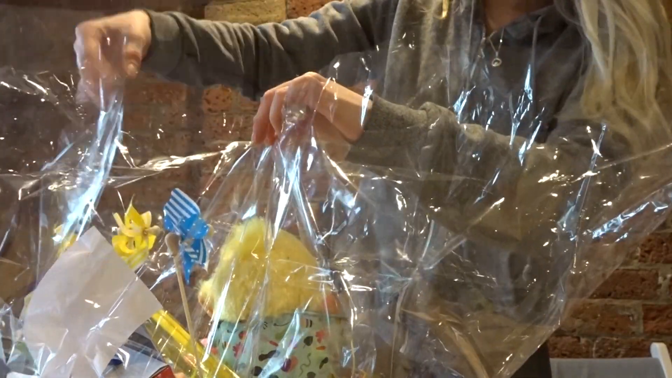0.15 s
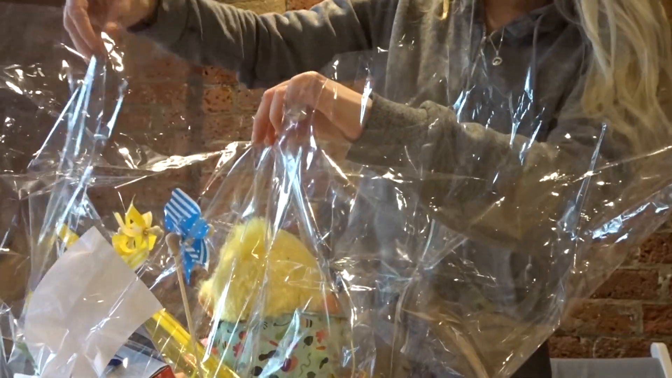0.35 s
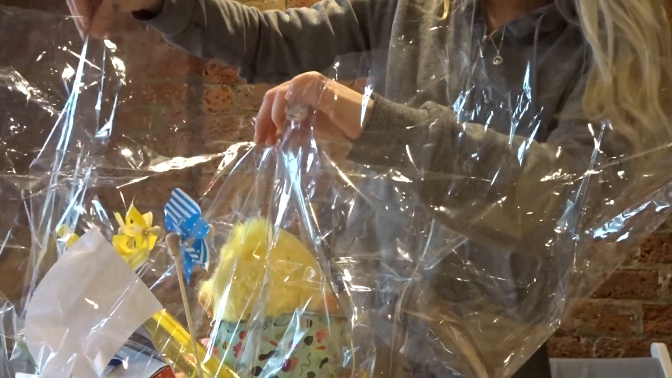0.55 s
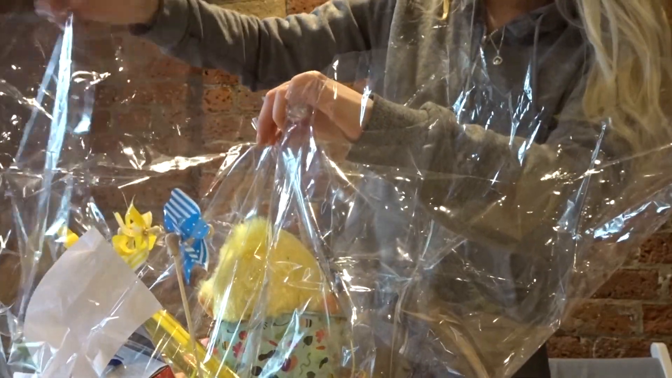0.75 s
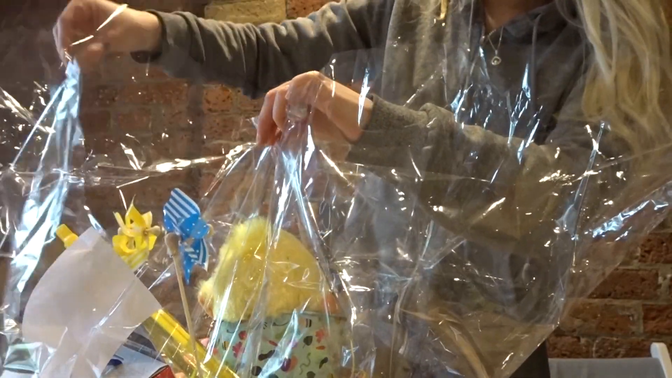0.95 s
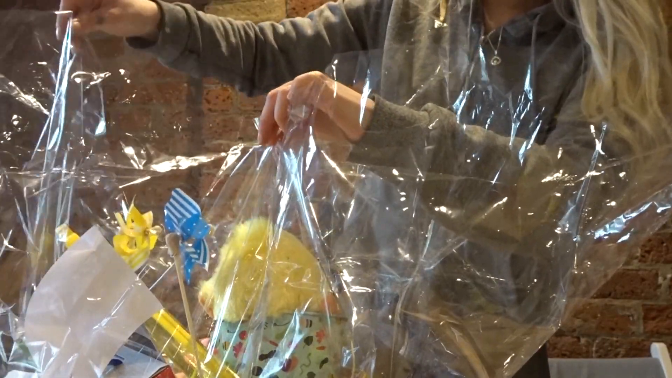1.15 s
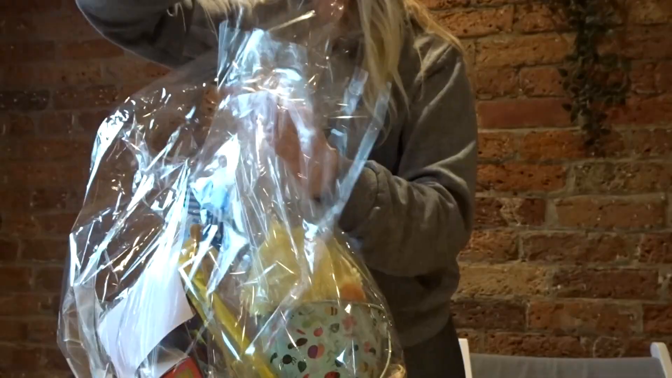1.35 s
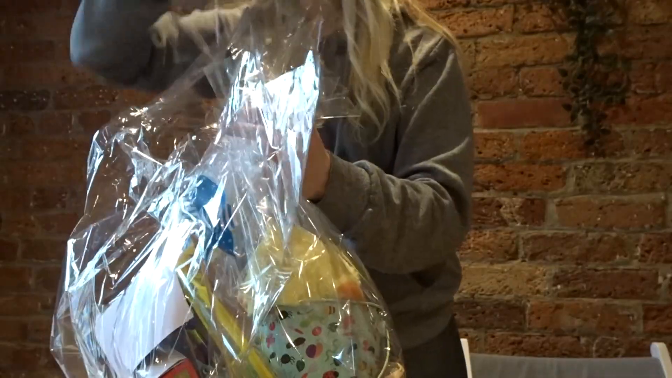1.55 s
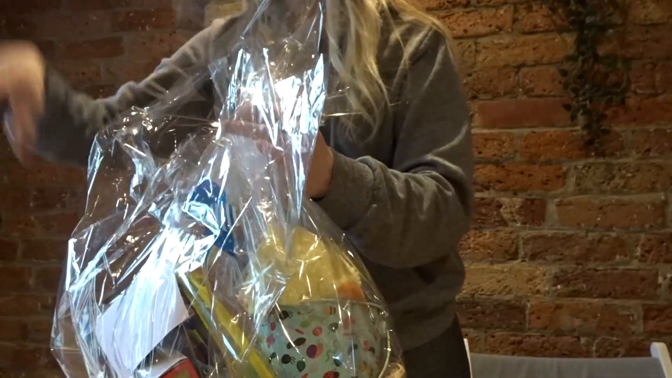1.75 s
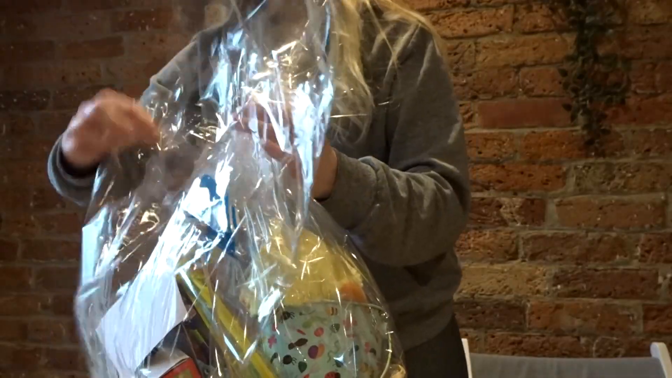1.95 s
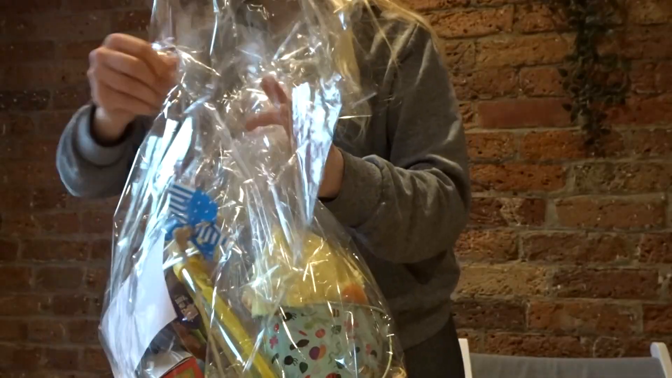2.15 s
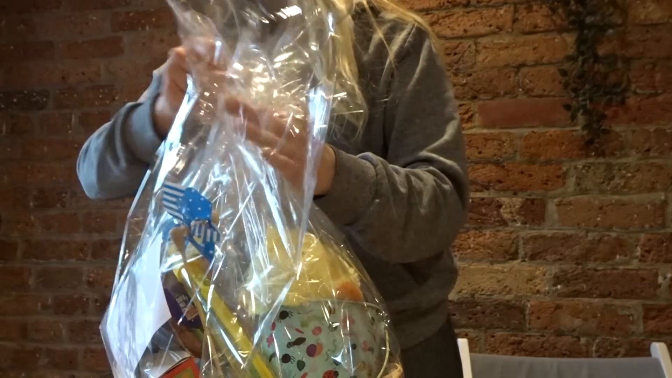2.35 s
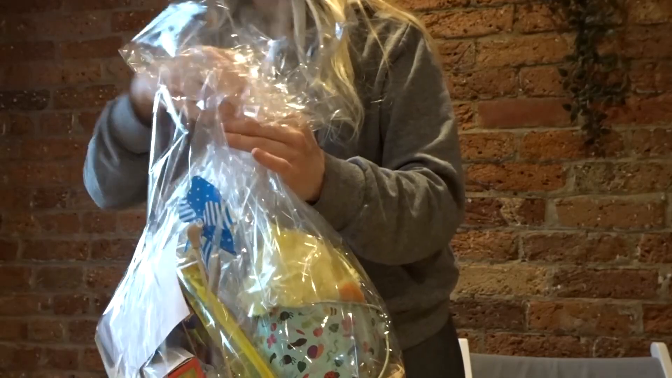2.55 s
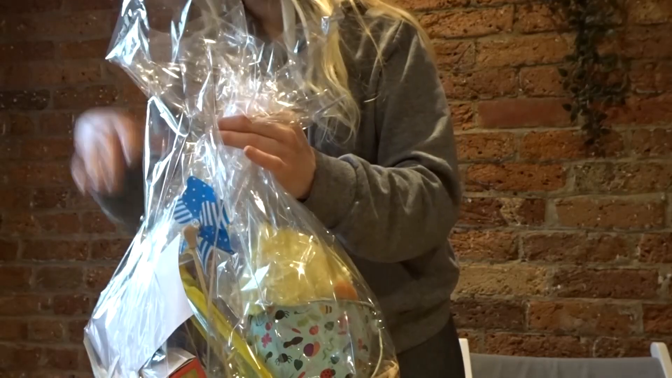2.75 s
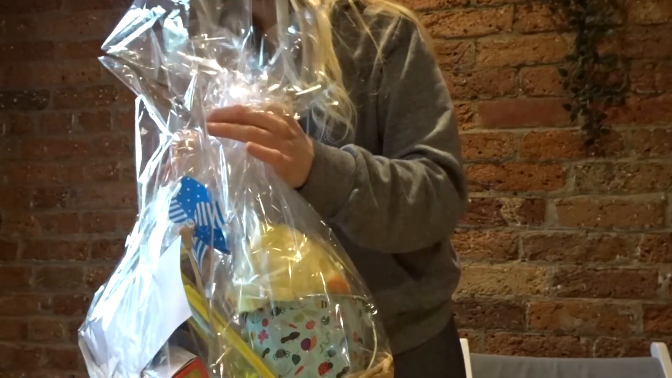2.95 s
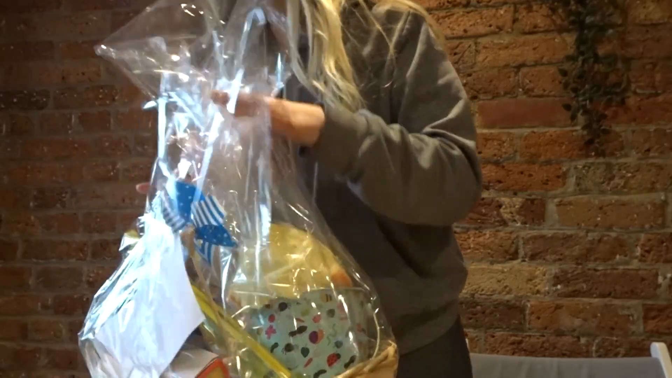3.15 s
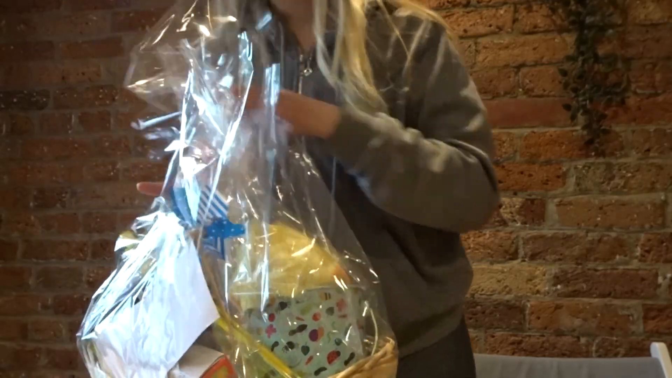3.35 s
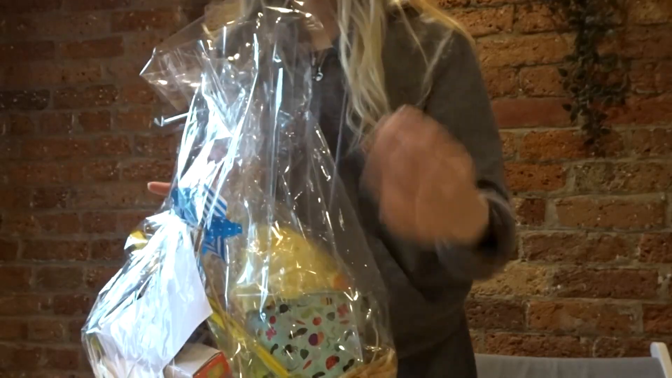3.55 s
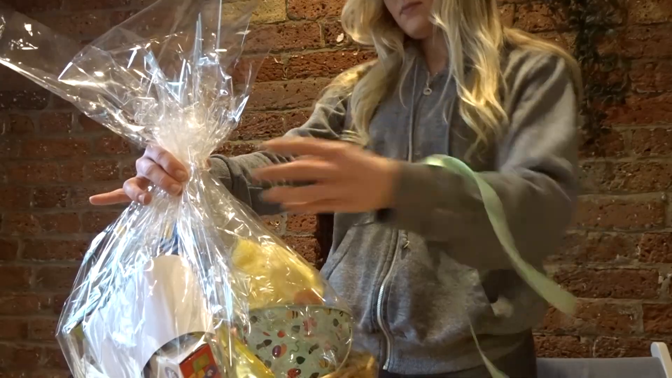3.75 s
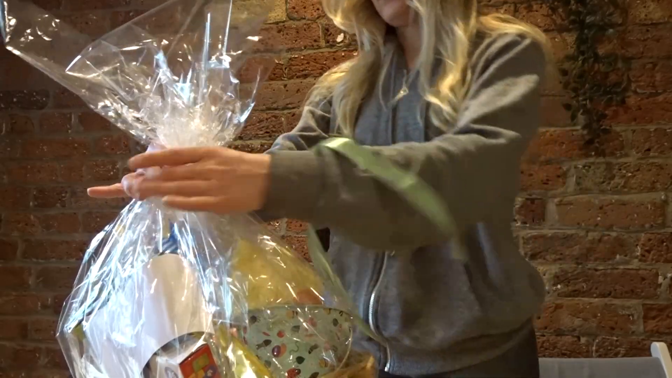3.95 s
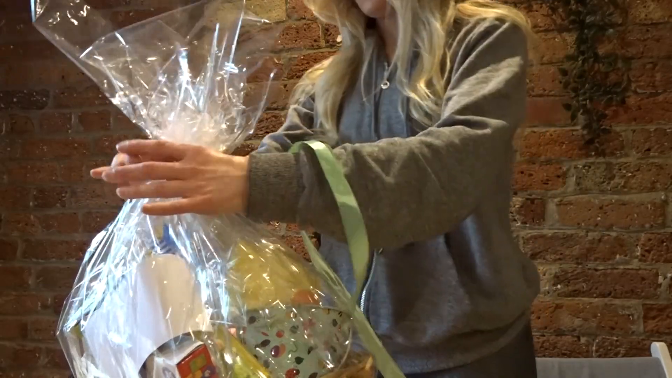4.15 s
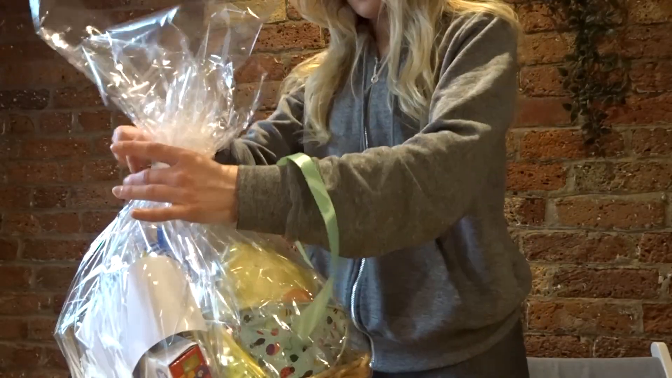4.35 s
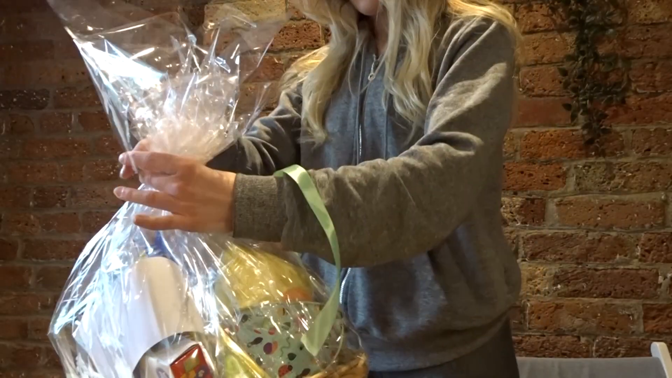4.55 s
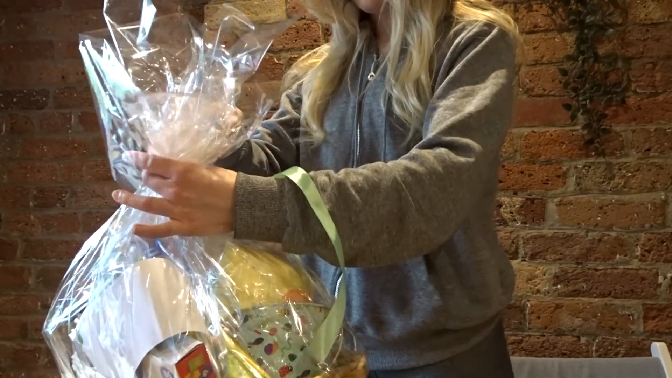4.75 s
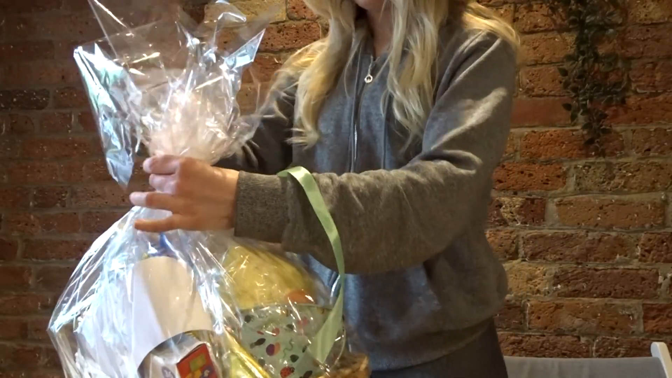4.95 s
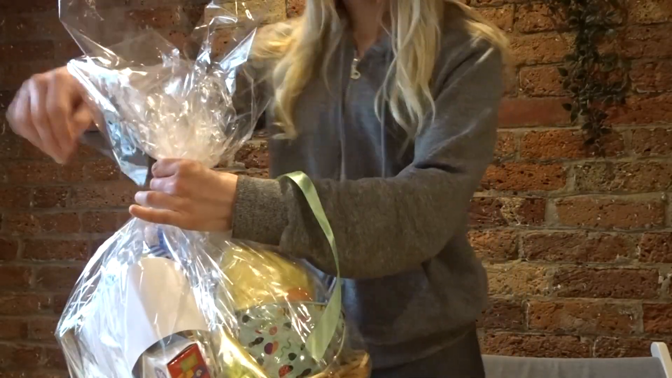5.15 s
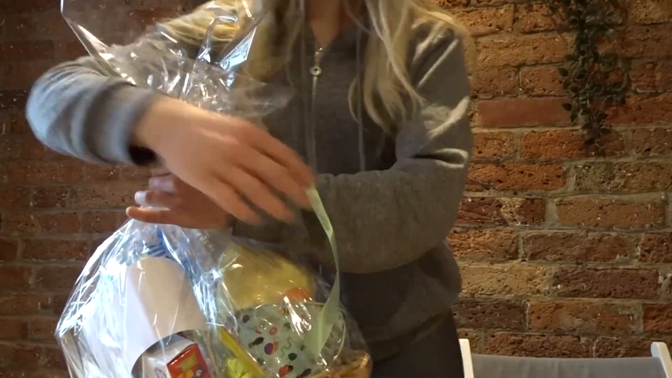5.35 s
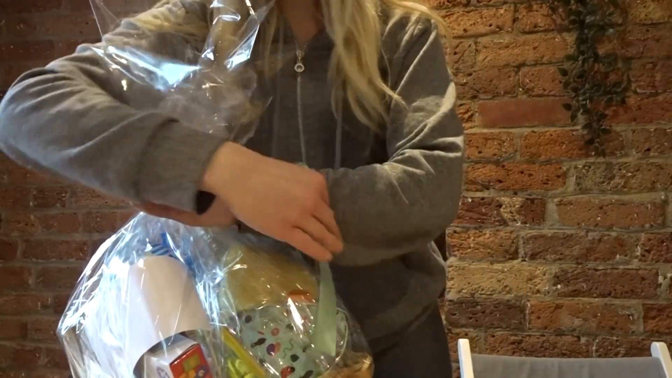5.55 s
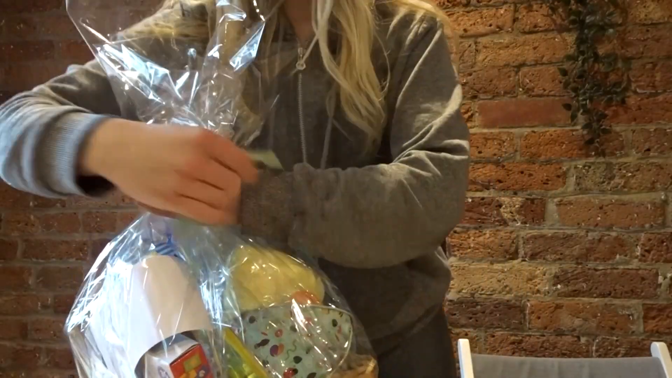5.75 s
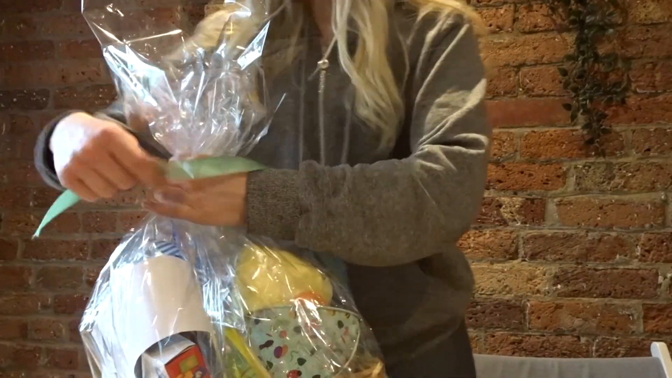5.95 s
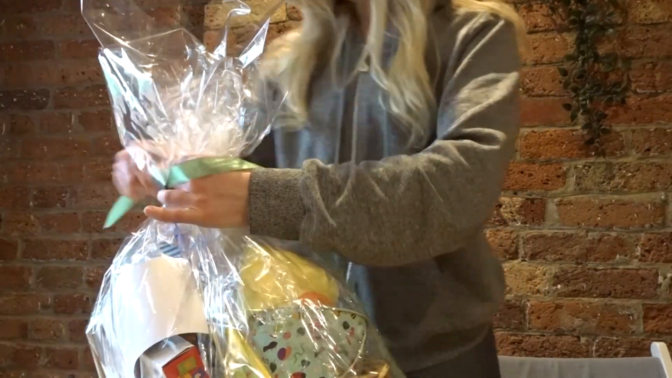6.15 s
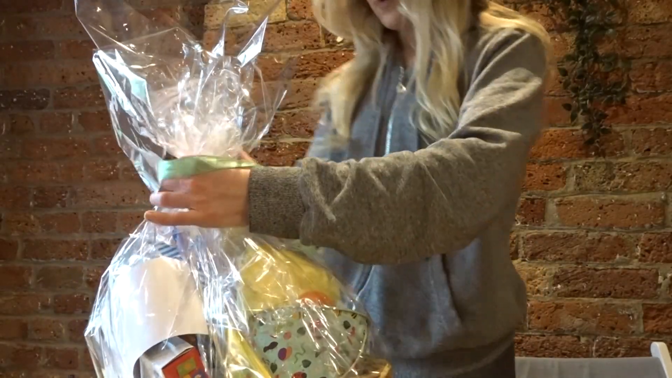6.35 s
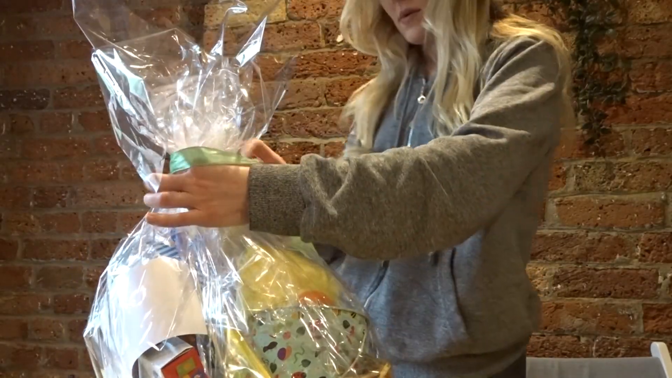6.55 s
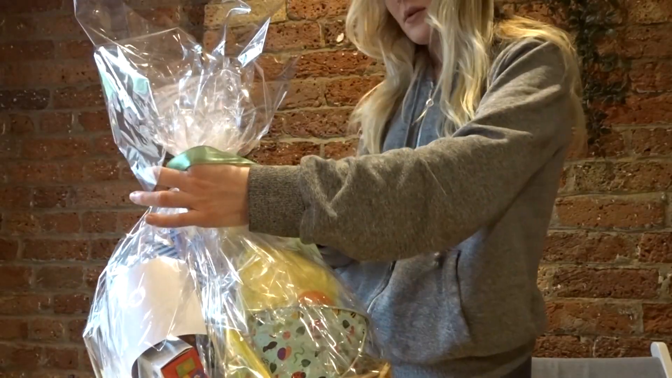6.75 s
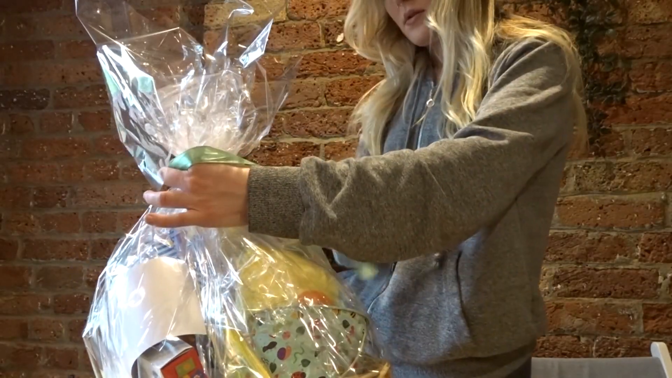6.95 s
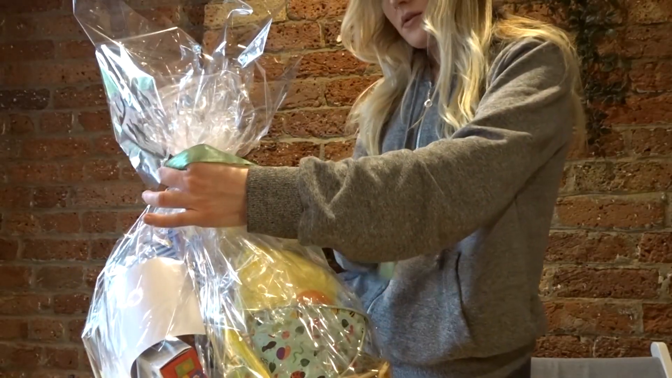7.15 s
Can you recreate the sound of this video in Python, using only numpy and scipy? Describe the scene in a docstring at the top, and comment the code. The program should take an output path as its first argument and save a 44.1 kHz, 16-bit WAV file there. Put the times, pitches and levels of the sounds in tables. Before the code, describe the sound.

A stiff sheet of clear film is bunched up close to the microphone in a small brick room. Dense bright crackling comes grab after grab, with sharp snaps and a low rustle underneath. Soft dull knocks come from hands and basket. A brief lull precedes more squeezing, then the last seconds hold only faint crinkles and scattered ticks over a quiet hush.

```python
"""A sheet of cellophane is gathered and bunched round a gift basket, grab by grab, crackling and snapping.
From about 2 s hands and basket knock softly; from about 5.6 s a fist holds the neck as a ribbon is wound on.
Crinkles, pops and snaps are damped sine clicks, the low rustle is shaped noise, the knocks are decaying sines.
A small brick room answers with noise that follows the clicks, over a still hush; two close camera microphones listen."""
import sys
import numpy as np
from scipy import signal
from scipy.fft import rfft, irfft, next_fast_len
from scipy.io import wavfile
from scipy.ndimage import map_coordinates

SR = 44100
rng = np.random.default_rng(int(sys.argv[2]) if len(sys.argv) > 2 else 0)


def put_to_file(sound):
    """Save the sound as 16-bit audio at rate SR, in the file named by the first command-line argument."""
    columns = np.atleast_2d(sound).T  # one column per channel
    safe = np.clip(columns, -1, 1)
    whole_steps = np.round(safe * 32767)
    wavfile.write(sys.argv[1], SR, whole_steps.astype(np.int16))


N = 317927

FINEST_HZ = 10900  # the highest pitch of a snap or pop
DECAY = np.log(1000)  # a fall of 60 dB, as an exponent


def amp(db):
    """Decibels to gain."""
    return 10 ** (np.asarray(db) / 20)


def unit(x):
    """Scale to rms 1."""
    return x / np.sqrt(np.mean(x ** 2) + 1e-20)


def along(points, hz):
    """(Hz, value) points read on a log frequency axis."""
    f, v = np.transpose(points)
    return np.interp(np.log(hz + 1), np.log(f + 1), v)


def curves(rows):
    """One value per sample for each column after the time."""
    s, *cols = np.transpose(rows)
    return [np.interp(np.arange(N) / SR, s, c) for c in cols]


def wobble(rate):
    """A smooth random curve, rate knots a second."""
    knots = rng.standard_normal(int(N * rate / SR) + 4)
    return map_coordinates(knots, [np.arange(N) * rate / SR])


def filtered(x, response):
    """x times a response of frequency."""
    m = next_fast_len(N + SR // 2)
    return irfft(rfft(x, m) * response(np.fft.rfftfreq(m, 1 / SR)), m)[..., :N]


def coloured(x, spectrum, size=2048):
    """A causal minimum-phase filter of unit power, so that clicks keep their sharp fronts."""
    gain = unit(amp(along(spectrum, np.fft.rfftfreq(size, 1 / SR))))
    # folding the cepstrum forward in time makes the phase minimal
    cepstrum = irfft(np.log(gain))
    cepstrum[1:size // 2] *= 2
    cepstrum[size // 2 + 1:] = 0
    impulse = irfft(np.exp(rfft(cepstrum)))
    return signal.fftconvolve(x, impulse[None], axes=1)[:, :N]


def diffuse(pair, hz):
    """Two unrelated spectra become left and right: alike in the bass, mostly apart in the treble."""
    # likeness of left and right in diffuse sound: f/Hz, correlation
    alike = [(100, .997), (600, 0.97), (1400, 0.84), (3100, 0.89), (5000, 0.044), (7500, 0.21),
             (15000, 0.49)]
    turn = np.arccos(np.clip(along(alike, hz), -1, 1)) / 2
    mid, side = pair[0] * np.cos(turn), pair[1] * np.sin(turn)
    return np.array([mid + side, mid - side])


def rush(spectrum):
    """Diffuse stereo noise of rms 1."""
    m = next_fast_len(N)
    hz = np.fft.rfftfreq(m, 1 / SR)
    spectra = diffuse(rfft(rng.standard_normal((2, m))), hz)
    return unit(irfft(spectra * amp(along(spectrum, hz)), m)[:, :N])


def clicks(s, peak, hz, cycles, lag_s, lag_spread_s, pan_db, size=112):
    """Sines that fall 60 dB in a few cycles, each from its own place; a positive lag lets the left lead."""
    place, facing = rng.standard_normal((len(s), 2)).T
    # begin 4 samples early, as one side may lead
    index = (s * SR).astype(int)[:, None] + np.arange(size) - 4
    out = []
    for side in (1, -1):
        start = s - side * (lag_s + lag_spread_s * place) / 2
        turns = np.maximum(index / SR - start[:, None], 0) * hz[:, None]
        turns = turns.astype(np.float32)
        wave = np.sin(2 * np.pi * turns) * np.exp(-turns * float(DECAY / cycles))
        wave *= (peak * amp(side * pan_db * facing / 2))[:, None]
        out.append(np.bincount(np.clip(index, 0, N).ravel(), wave.ravel(), N + 1)[:N])
    return np.array(out)


def click_peak(db, hz, cycles):
    """Peak of a click with this rms over 1 ms: the shorter it is, the taller it stands."""
    return amp(db) * np.sqrt(4 * DECAY * hz / cycles / 1000)


def radiated(x):
    """A small patch of film radiates little bass, and its flip is too slow for the top treble."""
    return signal.sosfilt(signal.butter(3, [1350, 11000], "band", fs=SR, output="sos"), x)


def work(idle_db=-54, close_s=.1):
    """How hard the film is worked, in dB: each grab rises, holds and lets go; at the end the fist holds on."""
    # each grab, pull or squeeze of the hands: start t/s, rise/s, hold/s, work/dB, change over the hold/dB
    grabs = [(0.0, .003, .11, -28, -12), (0.152, .06, .015, -18.5, -0.5), (0.24, .05, .14, -22.5, 2),
             (0.496, .014, .02, -17.5, -2), (0.664, .004, .05, -31, -10), (0.782, .01, .03, -20, -2),
             (0.893, .02, .095, -18.5, -2), (1.047, .02, .022, -15, 1), (1.11, .03, .09, -28, -6),
             (1.242, .005, .09, -18.5, 1.5), (1.32, .06, .095, -14, -1), (1.52, .05, .025, -20, 0),
             (1.721, .03, .08, -34, -1), (1.922, .1, .22, -13, -3), (2.22, .26, .22, -14, -1.5),
             (2.743, .03, .15, -26, -1), (2.915, .11, .29, -14.5, 1.5), (3.33, .04, .065, -18, -2),
             (3.46, .04, .025, -15, -1), (3.775, .01, .06, -42, -1), (3.86, .02, .07, -31, -1),
             (3.965, .015, .08, -21, 3), (4.09, .08, .27, -19.5, -1.5), (4.43, .1, .24, -18, 1),
             (4.79, .05, .28, -23, 4), (5.17, .02, .06, -29, 0), (5.262, .025, .05, -15.5, -1),
             (5.359, .04, .18, -20.5, -7), (6.299, .04, .06, -30.5, 5), (6.485, .006, .025, -27, -4)]
    # the fist on the neck while the ribbon is wound on: t/s, work/dB
    fist = [(5.6, -31), (5.78, -30.5), (5.97, -38), (6.1, -33), (6.2, -41), (6.28, -34), (6.46, -38),
            (6.56, -33), (6.7, -40), (6.8, -34), (6.92, -39.5), (7.04, -39), (7.13, -32)]
    lead_db, lead_db_per_s = -15, 500  # a few creases give way just before a grab takes hold
    # the crinkle dies away on letting go, faster after a quick flick, then stops
    release_db_per_s, flick_db, stop_s = 175, 4, .135
    t = np.arange(N) / SR
    fist_db, = curves(fist)
    closing = np.clip(1 + (t - fist[0][0]) / close_s, 0, 1)
    power = amp(idle_db) ** 2 + amp(fist_db) ** 2 * closing
    for start, rise, hold, db, change_db in grabs:
        lead = amp(lead_db - lead_db_per_s * np.maximum(start - t, 0)) ** 2
        attack = np.clip((t - start) / rise, lead, 1)
        held = np.clip((t - start - rise) / hold, 0, 1)
        after = np.maximum(t - start - rise - hold, 0)
        moving = np.exp(-(after / stop_s) ** 6)
        fall_db = (release_db_per_s + flick_db / (rise + hold)) * after
        power = power + attack * moving * amp(db + change_db * held - fall_db) ** 2
    return 10 * np.log10(power)


def crinkle(work_db, tight_db, wide_db, per_second=4400, crowding=.92, clump_db=1.81, biggest=2.9):
    """Countless small buckles: harder work makes them denser and louder; the size of a facet sets its pitch."""
    # how unequal the buckles are: f/Hz, scatter of size/dB
    spread = [(1200, 2.5), (3500, 3.5), (8500, 3), (12500, -3)]
    # overall colour of the crinkle: f/Hz, relative level/dB
    colour = [(400, -26.5), (750, -10), (1150, -6.5), (1600, -3.5), (2400, -1), (4200, 2), (6300, 0),
              (9000, -1), (12000, -4), (16000, -7.5)]
    rate = per_second * amp(crowding * (work_db + 21))
    # one buckle sets off its neighbours, so they come in clumps
    clumps = amp(clump_db * (wobble(50) + wobble(260)))
    passed = np.cumsum(rate * clumps / clumps.mean()) / SR
    at = np.searchsorted(passed, rng.uniform(0, passed[-1], int(passed[-1])))
    hz = np.geomspace(900, 17000, 256)[rng.integers(256, size=len(at))]
    # most are tiny and a few large; a facet may pop in or out
    size_db = along(spread, hz) * np.minimum(rng.standard_normal(len(at)), biggest)
    strength = unit(amp(size_db)) * rng.choice([-1, 1], len(at))
    # wide facets speak below 4 kHz, tight folds above
    octaves = np.clip(np.log2(hz / 4000), -1, 1)
    fold_db = np.abs(octaves) * np.where(octaves > 0, tight_db[at], wide_db[at])
    # small facets flip faster and so radiate a taller pulse
    peak = strength * unit(hz) * amp(work_db[at] + fold_db) * np.sqrt(SR / rate[at])
    # clicks below 9 kHz reach the left a little first; on average the finest fizz reaches both sides together
    lag_s = 2.9e-5 * (hz < 9000)
    buckles = clicks(at / SR, peak, hz, cycles=5.28, lag_s=lag_s, lag_spread_s=1.2e-5, pan_db=-0.5)
    return coloured(buckles, colour)


def snaps(run_s=0.00123, follow_db=-7, scatter=0.34, cycles=4, count=6):
    """A long crease flips with one sharp click; weaker, mostly higher ones run along it at once."""
    # single creases that flip over: t/s, rms level over 1 ms before the radiation filter/dB, f/Hz
    creases = [(0.339, -14, 4450), (0.3871, -14.5, 4500), (0.6667, -11.3, 4160), (0.9161, -11.5, 4880),
               (1.0073, -12.2, 4640), (1.2452, -11.5, 5260), (1.6523, -15, 4860), (1.7313, -12, 4210),
               (1.7528, -16.5, 5070), (1.7798, -13.5, 3650), (1.926, -13, 4510), (2.7533, -11.7, 4710),
               (2.9158, -13, 6330), (2.9493, -11.5, 4770), (3.6434, -25.1, 5270), (3.78, -27.4, 3160),
               (3.8407, -26.5, 3540), (3.9775, -8.7, 5830), (4.0429, -8, 4680), (4.1217, -13.4, 3490),
               (4.7189, -8.4, 3640), (4.8319, -11.3, 4000), (5.0528, -10.6, 3340), (5.2437, -13.5, 4030),
               (5.5109, -15.7, 4390), (5.5349, -9.5, 4180), (5.5865, -16.8, 4380), (5.6256, -16.5, 3800),
               (5.7252, -19.6, 2910), (5.761, -15.5, 4230), (5.8441, -20.1, 4900), (5.9004, -20.5, 5200),
               (6.0276, -21, 3500), (6.1183, -14.2, 4960), (6.2812, -18.6, 5750), (6.3243, -17.5, 5670),
               (6.3978, -17.5, 3280), (6.491, -13, 5730), (6.5424, -22.5, 6170), (6.578, -23.7, 4520),
               (6.7363, -25.9, 6340), (6.7569, -22, 2500), (6.8383, -23.3, 3500), (6.903, -25.1, 4420),
               (6.959, -24.5, 3490), (6.9915, -24.6, 4160), (7.0691, -24.5, 5220)]
    s, db, hz = np.transpose(creases)
    follows = np.arange(count) > 0
    times = s[:, None] + follows * run_s * rng.random((len(s), count))
    share = np.where(follows, amp(follow_db) * (2 * rng.random(times.shape) - 1), 1)
    share /= np.linalg.norm(share, axis=1, keepdims=True)
    rise = np.exp(follows * scatter * (1 + rng.standard_normal(times.shape)))
    pitch = np.minimum(hz[:, None] * rise, FINEST_HZ)
    peak = share * click_peak(db[:, None], pitch, cycles)
    return radiated(clicks(times.ravel(), peak.ravel(), pitch.ravel(), cycles,
                           lag_s=2.2e-5, lag_spread_s=1e-5, pan_db=1.5))


def pops(work_db, per_second=40, pitch_hz=4200, cycles=11):
    """Here and there a stiffer facet pops out of the crowd and rings briefly at its own pitch."""
    pop_db, scatter_db = -19, 3  # rms over 1 ms at -20 dB of work, before the radiation filter
    growth = .62  # dB per dB of work: a pop stands out most when the film is nearly still
    at = rng.integers(N, size=round(per_second * N / SR))
    size, pitch = np.clip(rng.standard_normal((2, len(at))), -2, 1.5)
    hz = np.minimum(pitch_hz * np.exp(.55 * pitch), FINEST_HZ)
    db = pop_db + growth * (work_db[at] + 20) + scatter_db * size
    return radiated(clicks(at / SR, click_peak(db, hz, cycles), hz, cycles,
                           lag_s=2.2e-5, lag_spread_s=1e-5, pan_db=1.5))


def flexing(work_db, rustle_db, growth=0.6, flutter_db=1.8):
    """The broad sheet bends and slides over the basket: a low, uneven rustle that grows with the work."""
    # colour of the low rustle: f/Hz, relative level/dB
    flex = [(25, -42), (45, -33), (60, -17), (78, -15), (92, -5.5), (120, -15.5), (155, -2), (250, -3),
            (320, 2.5), (480, -0.5), (800, -1), (1300, -15), (2500, -11)]
    level_db = rustle_db + growth * (work_db + 24) + flutter_db * wobble(70)
    return amp(level_db) * rush(flex)


def bumps(rise_s=0.0041):
    """Hands and basket knock softly: dull, short thuds of decaying sines with a softened front."""
    # soft knocks: t/s, level before the soft front and decay/dB, f/Hz, t60/s
    knocks = [(2.21, -43, 34, .4), (3.019, -31, 154, .16), (3.023, -27.5, 103, 0.16), (3.03, -31, 62, 0.18),
              (3.225, -44, 70, .2), (4.35, -40, 91, .2), (5.094, -31, 313, 0.083), (6.385, -47, 75.5, .2),
              (6.395, -30, 313, 0.069), (7.135, -33, 343.5, 0.097)]
    out = np.zeros(N)
    for s, db, hz, t60 in knocks:
        t = np.arange(N - round(s * SR)) / SR
        envelope = np.exp(-DECAY * t / t60) * (1 - np.exp(-t / rise_s))
        out[N - len(t):] += amp(db) * np.sin(2 * np.pi * hz * t) * envelope
    return out


def room(x, near_db=-9, near_t60=.025, walls_db=-3.5, size=128):
    """Sound scatters briefly among the folds and off the table, then lingers between the walls."""
    # decay between the walls: f/Hz, t60/s
    walls = [(2000, 0.4), (5000, 0.36), (15000, 0.27)]
    hz, t, z = signal.stft(x, SR, nperseg=size)
    power = np.mean(np.abs(z) ** 2, axis=0)
    lag = t[t < .5]

    def decay(t60):
        """Share of the energy that returns at each delay."""
        share = np.exp(-2 * DECAY * lag / t60) * (lag > 0)
        return share / share.sum(axis=-1, keepdims=True)

    near = amp(near_db) ** 2 * decay(near_t60)
    answer = near + amp(walls_db) ** 2 * decay(along(walls, hz)[:, None])
    lingering = np.abs(signal.fftconvolve(power, answer, axes=1)[:, :len(t)])
    # every buckle comes from another place, so the echoes merge into noise
    noise = diffuse(signal.stft(rng.standard_normal((2, N)), SR, nperseg=size)[2], hz[:, None])
    return signal.istft(noise / noise.std() * np.sqrt(lingering), SR, nperseg=size)[1][:, :N]


def still_room(level_db=-66.5):
    """The steady hush of the still room: diffuse noise that weakens towards the treble."""
    # colour of the hush: f/Hz, relative level/dB
    hush = [(25, -4), (150, 2), (1500, -5), (16000, -19)]
    return amp(level_db) * rush(hush)


def scene():
    """The film in its room, a little to the left."""
    # how the sheet is held: t/s, lift of tight folds an octave or more above 4 kHz/dB,
    # lift of wide facets an octave or more below/dB, broad rustle level at -24 dB of work/dB
    folds = [(0.0, 2, 3, -38.5), (0.52, -.5, -8.5, -36), (0.95, -1.5, -3, -37.5), (1.08, -1, -4, -31.5),
             (1.36, 1.8, 0, -37), (2.08, 0.5, 0.5, -34), (2.45, 0, 2.5, -35.5), (2.77, 1.1, 2, -37.5),
             (3.25, 0.5, 3.5, -32.5), (3.7, 1, 2.5, -35.5), (3.98, 2, 3.8, -35.5), (4.63, -0.5, 5.5, -35),
             (5.4, 2, 3, -37.5), (6.1, 1.8, -0.5, -35.5), (6.4, -2, 3.5, -36.5), (6.7, -1, 8, -37.5),
             (7.0, 0.5, -0.5, -38.5), (7.2, -3, 3.5, -35.5)]
    # stereo balance: f/Hz, left minus right level/dB
    balance = [(200, -0.5), (700, 1.5), (1300, 1.1), (4400, 2), (8000, 3), (13000, -.2)]
    work_db = work()
    tight_db, wide_db, rustle_db = curves(folds)
    film = amp(-3.0) * crinkle(work_db, tight_db, wide_db) + pops(work_db) + snaps()
    sound = film + room(film) + flexing(work_db, rustle_db) + bumps() + still_room()
    return filtered(sound, lambda hz: amp(np.outer([1, -1], along(balance, hz)) / 2))


def record(dry):
    """The camera keeps nothing above its band limit of 15950 Hz."""
    return filtered(dry, lambda hz: hz < 15950)


dry = scene()
out = record(dry)
put_to_file(out)
```